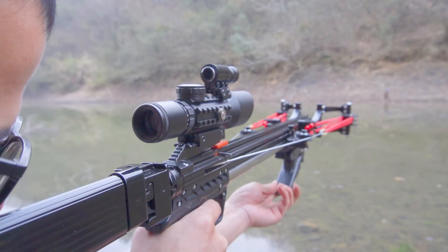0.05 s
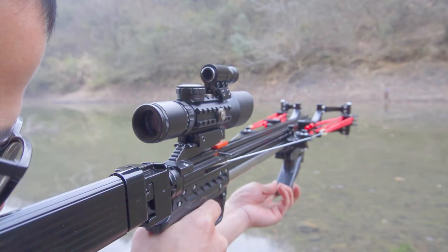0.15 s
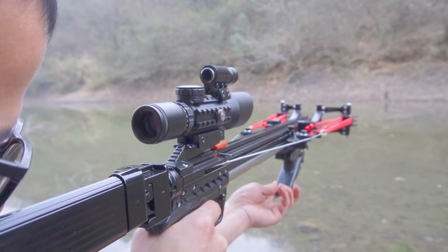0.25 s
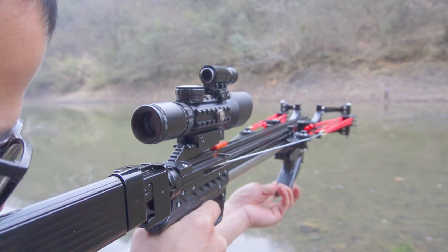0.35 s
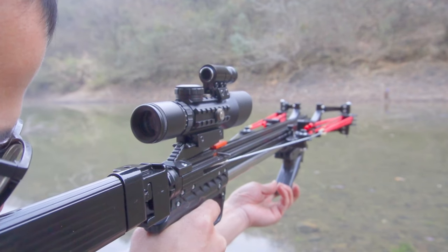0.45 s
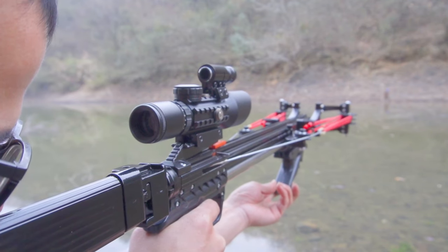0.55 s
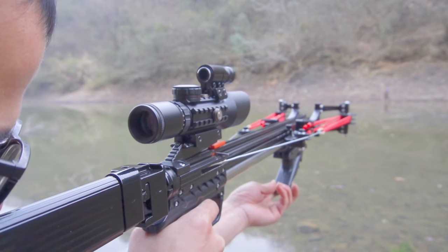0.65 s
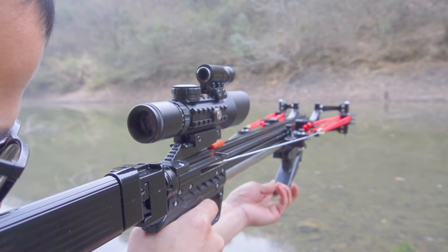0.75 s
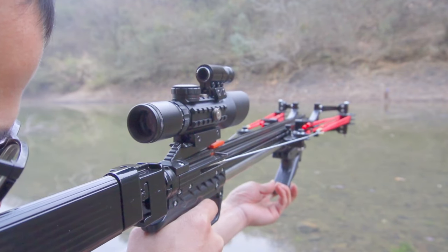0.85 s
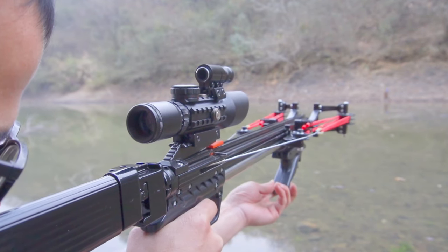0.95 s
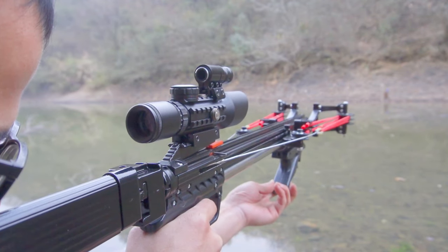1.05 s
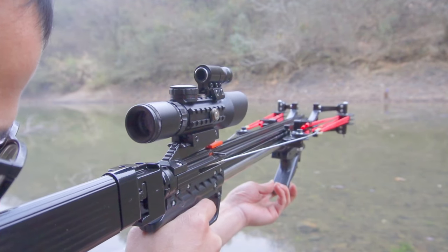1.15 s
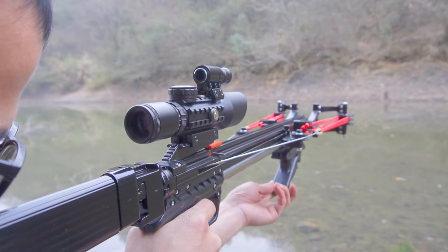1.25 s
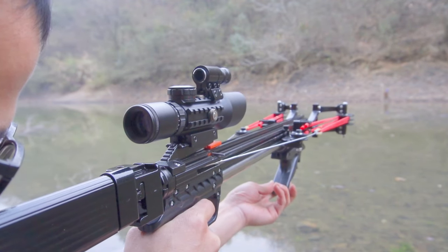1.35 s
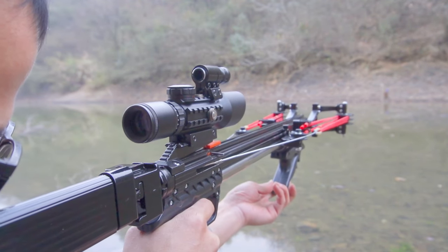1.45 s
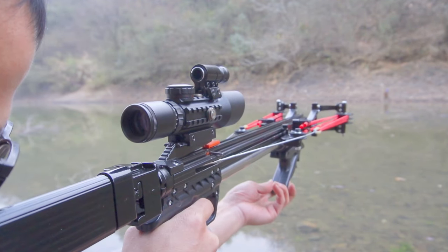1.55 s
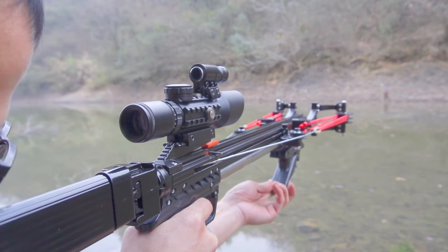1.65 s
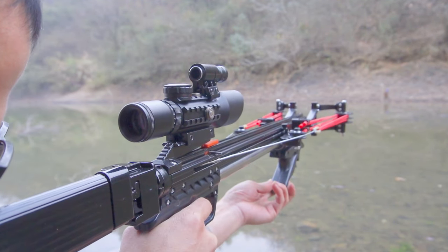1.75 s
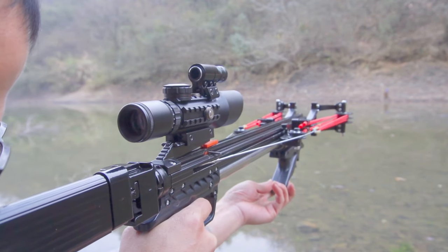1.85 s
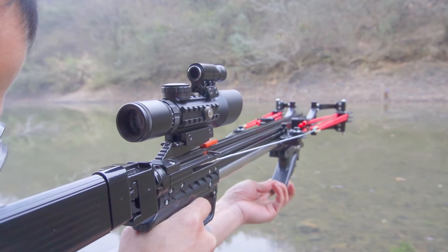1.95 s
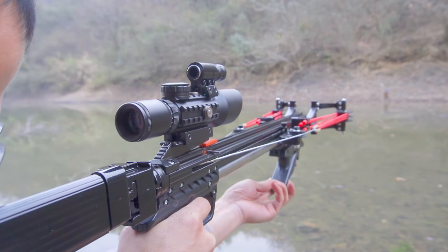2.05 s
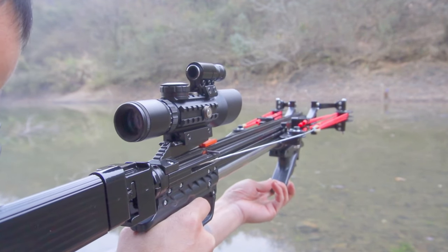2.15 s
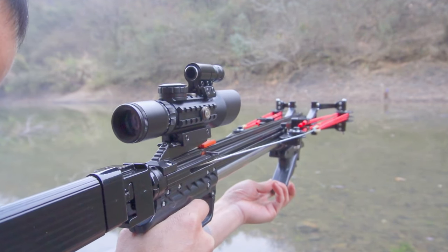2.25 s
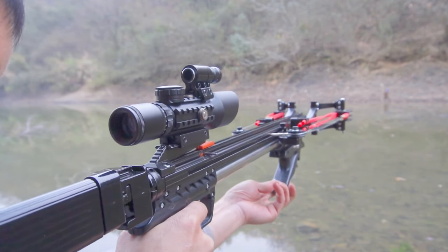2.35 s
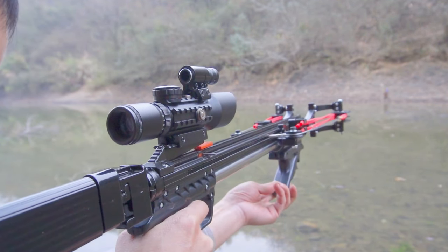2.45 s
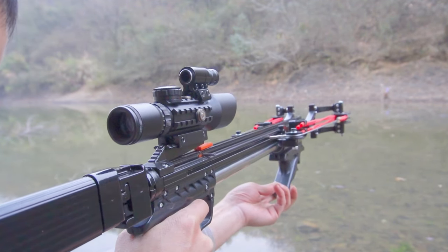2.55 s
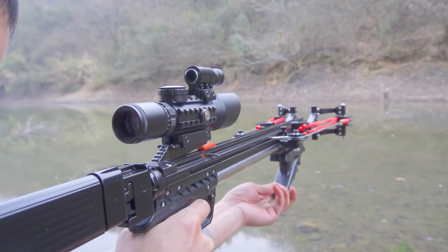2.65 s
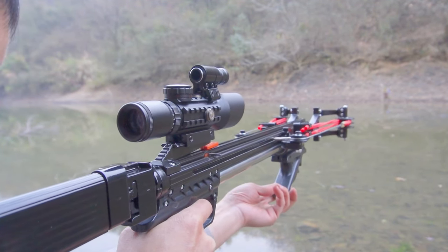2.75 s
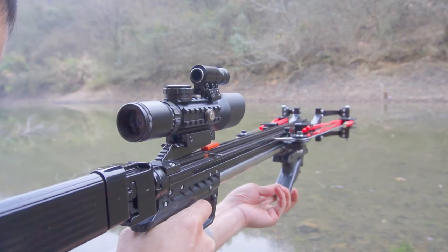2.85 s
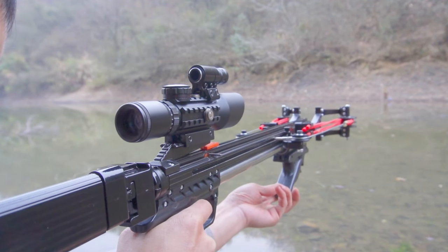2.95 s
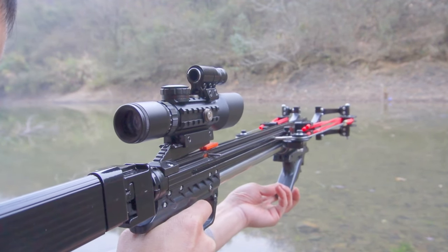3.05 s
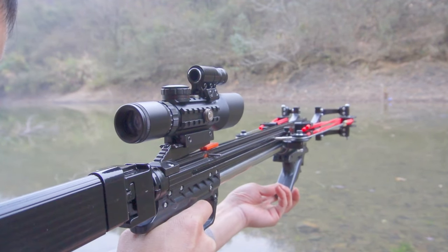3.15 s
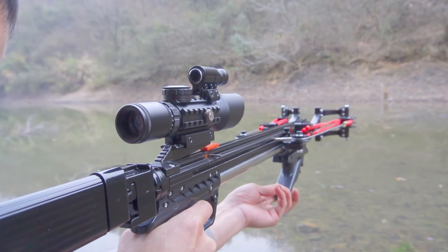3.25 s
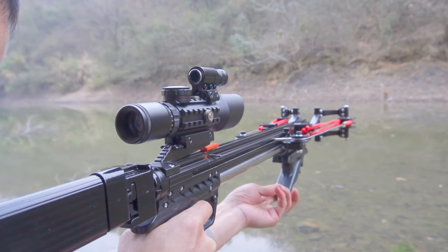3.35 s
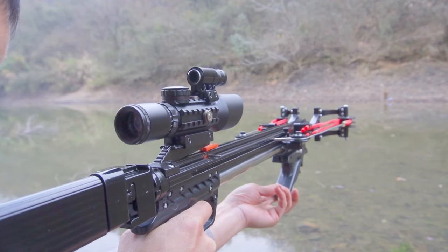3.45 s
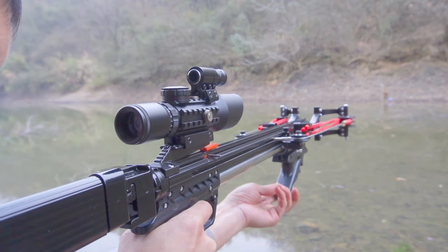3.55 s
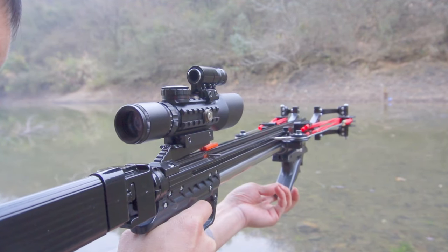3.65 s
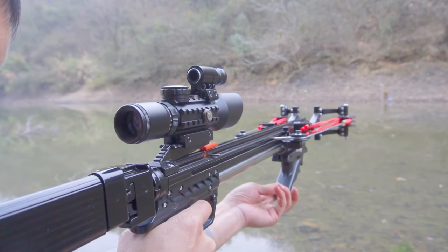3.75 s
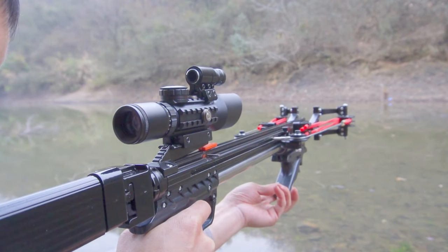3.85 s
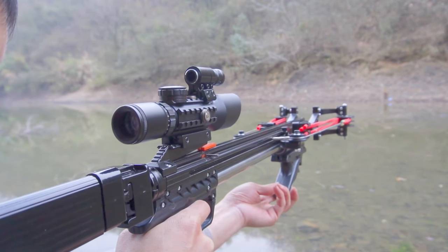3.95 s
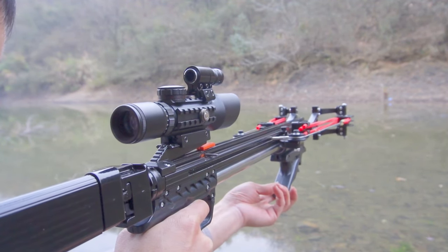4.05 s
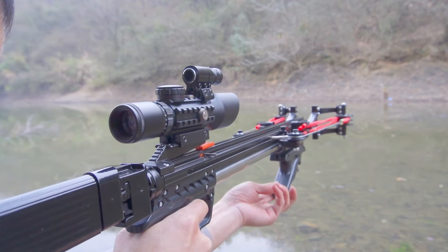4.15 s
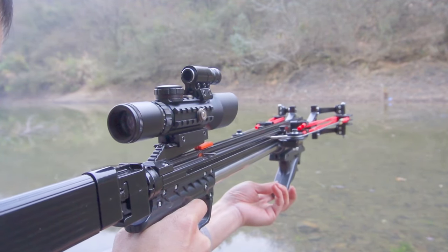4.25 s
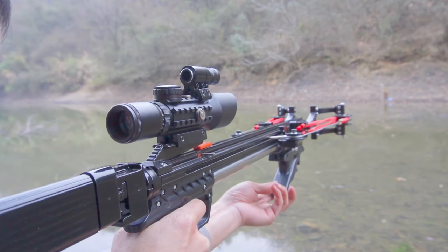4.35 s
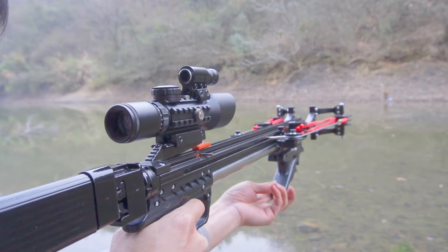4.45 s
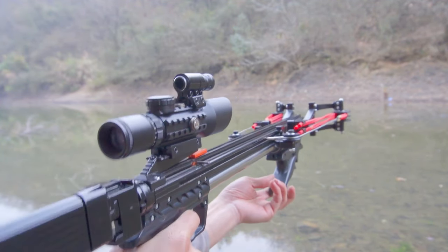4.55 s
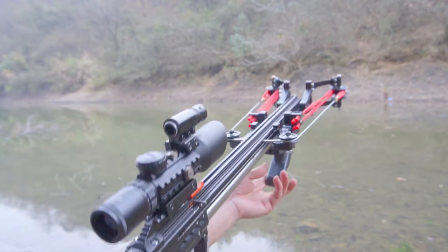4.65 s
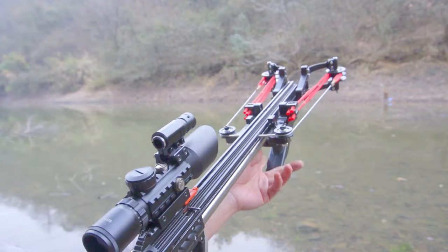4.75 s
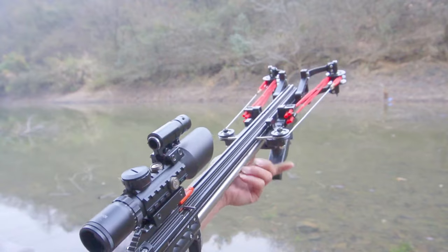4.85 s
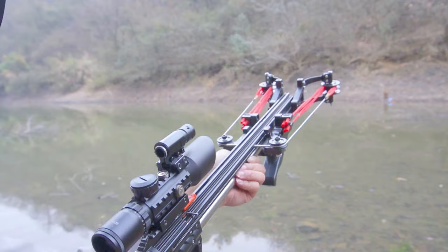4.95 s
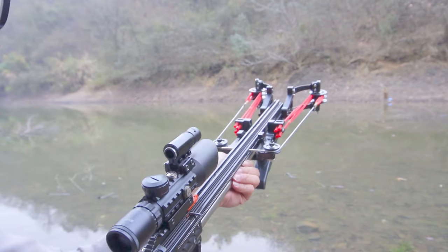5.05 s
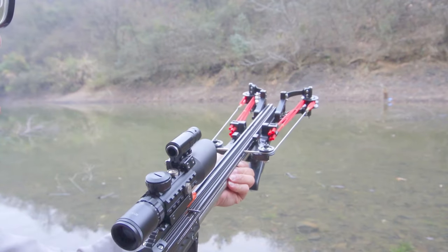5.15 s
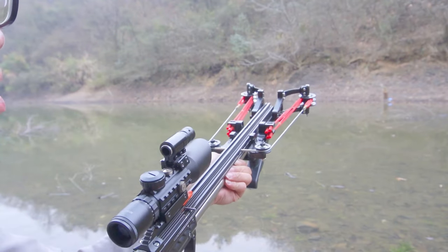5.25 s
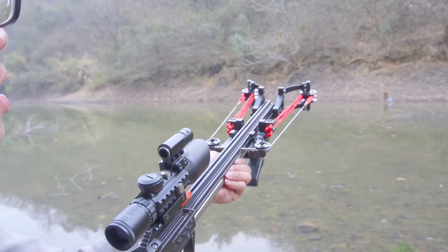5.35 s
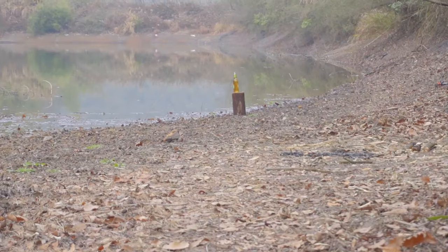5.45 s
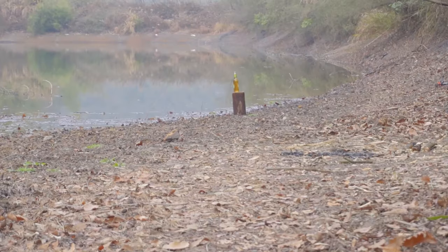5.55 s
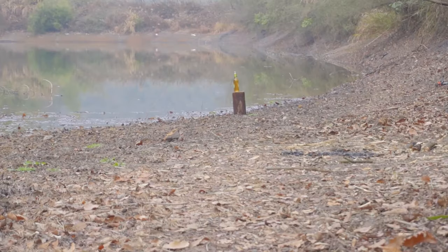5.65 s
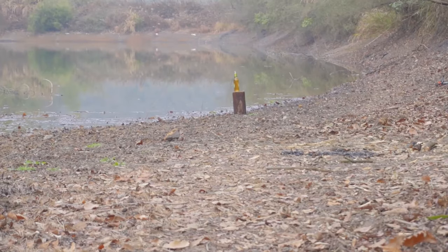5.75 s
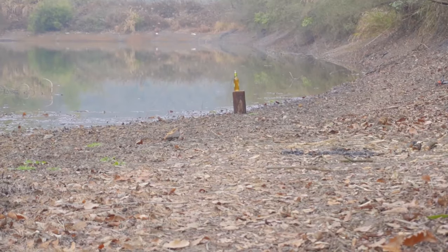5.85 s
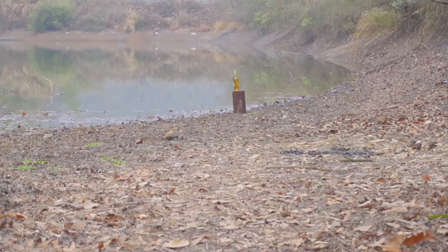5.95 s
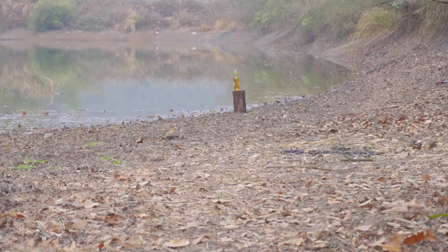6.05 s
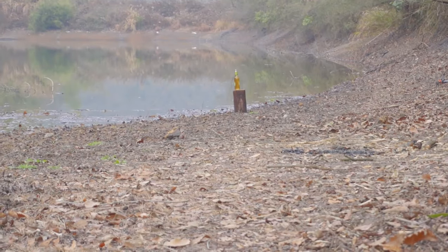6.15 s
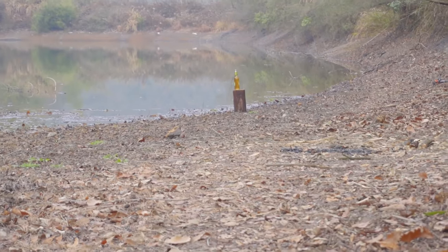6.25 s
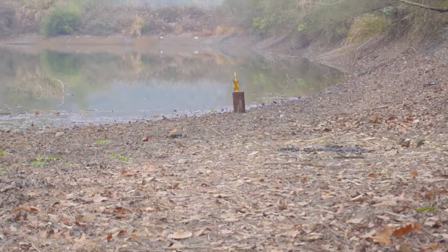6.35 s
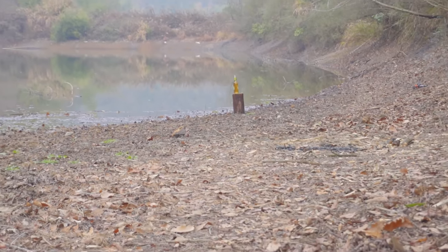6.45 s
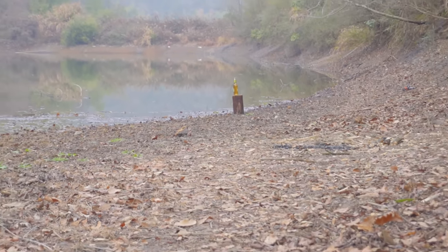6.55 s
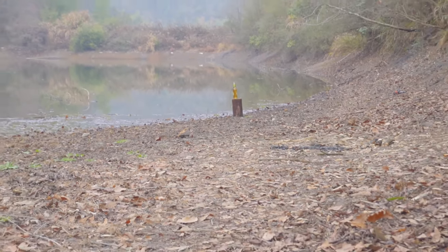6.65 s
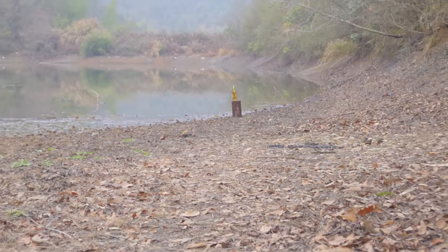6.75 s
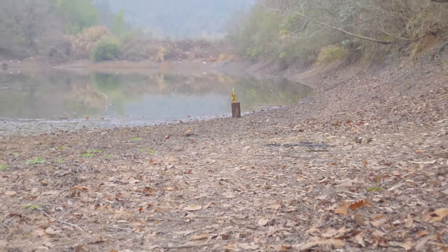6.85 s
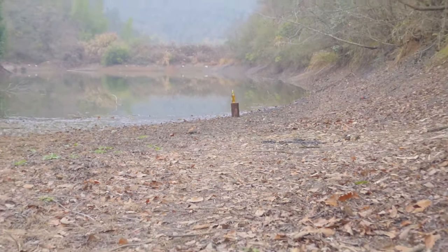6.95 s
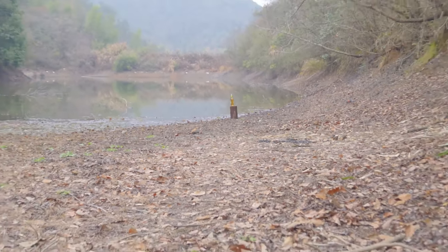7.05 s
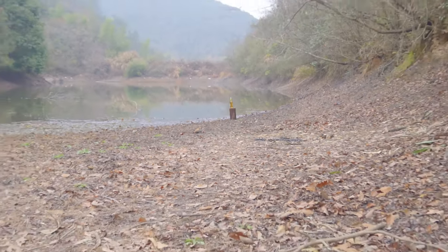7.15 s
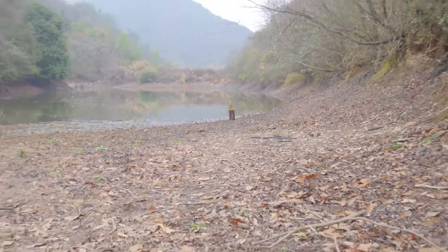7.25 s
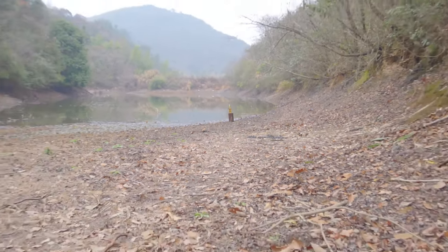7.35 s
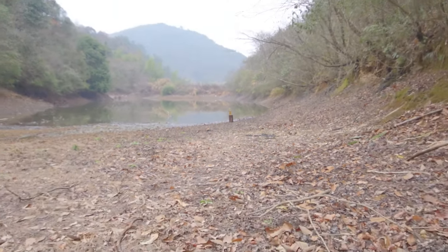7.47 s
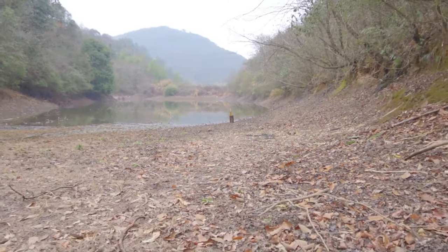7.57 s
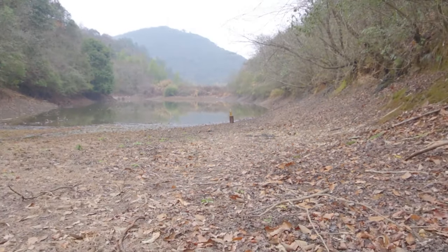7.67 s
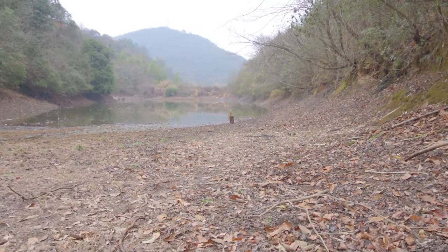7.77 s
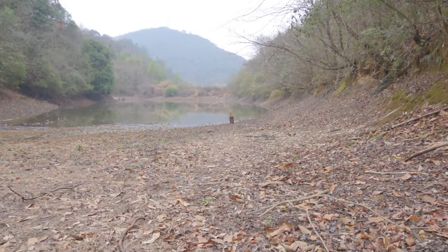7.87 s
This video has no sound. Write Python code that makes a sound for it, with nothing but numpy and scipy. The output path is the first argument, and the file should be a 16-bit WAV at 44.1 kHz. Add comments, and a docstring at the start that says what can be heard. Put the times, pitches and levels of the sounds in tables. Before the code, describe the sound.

Faint, steady valley hush by a pond, with sparse far birds: short rising two-note calls near 0.1, 0.9 and 3.9 seconds, thin whistles between. At 2.25 a close slingshot rifle fires: sear scrape and catch snap, a fast rush of bands, hard carriage slam at 2.32, slack bands flapping and loose parts rattling to 2.46, with a brief metallic ring. At 2.56 the ball cracks sharply into its target; banks scatter the sound for about a second while small bits patter until 3.1. Quiet returns. From 4.55 to 5.0 clustered clicks and sleeve rustle accompany the rifle tilting, with a firm tap at 4.89. From 5.5 fingers softly rub and thump the camera; faint squeak at 6.14, creaks from 6.64 to 6.96, then stronger ones at 7.37-7.54, ending in a sharp click, with low thumps and hollow rubbing until the end.

```python
"""A slingshot rifle fires beside a pond: noise bursts excite the resonances of frame and target as the catch
snaps, the carriage slams and the ball cracks home; decaying sines ring the metal, shaped noise is the bands.
Decaying noise serves as the echo of the banks. Clicks and cloth noise follow as the rifle is tilted, then
fingers rub, slide, thump and squeak on a camera whose mount creaks. Birds, as gliding sines, call far off
over a faint hush of steady noise."""
import sys
import numpy as np
from scipy import signal
from scipy.fft import rfft, irfft, next_fast_len
from scipy.io import wavfile

SR = 44100
rng = np.random.default_rng(int(sys.argv[2]) if len(sys.argv) > 2 else 0)


def int16_out(signal):
    """Quantize to a 16-bit WAV file."""
    q = np.round(np.clip(np.atleast_2d(signal).T, -1, 1) * 32767)
    wavfile.write(sys.argv[1], SR, q.astype(np.int16))


N = 348742

# Every level column in the tables is relative: later gains may shift the whole column.
# A positive pan_db leans to the left.
# Catch, carriage and loose parts of the rifle: start_s, body_db, knock_db, crack_db, t60_s, pan_db
CLACKS = [(2.2558, -12.5, -49, -32.5, 0.015, 2.5), (2.2597, -12.5, -49, -20.5, 0.02, 2.5),
          (2.2671, -8.5, -28.5, -25, 0.025, -2), (2.2724, -12.5, -46, -34, 0.02, 0),
          (2.2958, -13.5, -36, -26, 0.018, 0), (2.3024, -30, -35, -40, 0.016, -5),
          (2.3154, -9.5, -34, -36.5, 0.021, -1), (2.3221, -17, -23.5, -26.5, 0.01, 1),
          (2.3853, -26.5, -31, -45, 0.019, -4), (2.3994, -17, -54, -31, 0.012, 4),
          (2.4164, -26.5, -43, -46, 0.01, 0.5), (2.4555, -26, -39, -51, 0.011, -1)]
# The ball's impact and the bits that fall after it: start_s, body_db, knock_db, crack_db, t60_s, pan_db
IMPACTS = [(2.5565, -8.5, -32, -26.5, 0.011, 0), (2.6853, -22.5, -53.5, -35.5, 0.027, -0.5),
           (2.9049, -29, -48.5, -61, 0.016, -4), (2.9124, -51, -42.5, -62, 0.026, 0.5),
           (2.971, -51, -49, -68, 0.015, -3), (3.033, -53, -56.5, -69, 0.018, -2),
           (3.1034, -41, -64, -69, 0.0084, 6), (3.1153, -48, -63, -79, 0.01, -18)]
# Hands shifting on the rifle: start_s, body_db, knock_db, crack_db, pan_db
HANDLING = [(0.2065, -51, -47.5, -75, 0), (1.7045, -51, -67, -72, -2), (3.1674, -52, -81, -60.5, -10),
            (3.6465, -45, -82, -70, -8), (4.559, -45, -51, -49, 6), (4.5714, -42, -54, -52, 6),
            (4.58, -41, -54, -53, 2), (4.607, -35, -43, -47, 3), (4.6133, -24, -37, -41.5, 4.5),
            (4.6428, -28.5, -45, -49, 4), (4.6627, -30, -71, -47.5, 1), (4.7222, -39, -56, -71, -1),
            (4.776, -42, -45, -59, 0), (4.851, -31, -49.5, -38, -1), (4.857, -38, -54, -44, 12),
            (4.8893, -28.5, -42.5, -41, -0.5), (4.928, -35.5, -52.5, -41, 0),
            (4.9793, -62, -55.5, -67.5, 8), (5.1622, -50, -66, -73, 3)]
# Creaks of the camera mount, and one sharp click near the end: start_s, body_db, knock_db, crack_db
CREAKS = [(5.7732, -41.5, -49, -62), (5.8321, -41.5, -57, -65), (5.8436, -44, -61, -65),
          (6.6402, -28, -44.5, -61), (6.6476, -27, -47, -50), (6.6748, -24.5, -49, -56),
          (6.689, -28.5, -50, -45), (6.7404, -21, -47, -51), (6.767, -19.5, -41, -51),
          (6.7985, -24, -50, -61), (6.8141, -20.5, -43, -64), (6.8392, -25, -50, -64),
          (6.8665, -28.5, -60, -59), (6.889, -24, -40.5, -59), (6.9623, -32, -38.5, -50),
          (7.3748, -21.5, -40, -51), (7.3836, -21.5, -45, -62), (7.3998, -16, -36.5, -45),
          (7.4341, -19, -39.5, -53), (7.4677, -24.5, -33.5, -62), (7.4774, -30, -44, -59),
          (7.4881, -26, -38.5, -65), (7.5428, -19, -37.5, -37.5)]
# Resonances of the rifle frame: centre_hz, width_hz, level_db
FRAME = [(606, 450, -12), (970, 710, -7.5), (1450, 520, -2), (2130, 630, 2), (2880, 340, 5.5),
         (3400, 455, 7.5), (4590, 860, 3.5), (4680, 900, -2), (6760, 2350, -11), (10300, 1300, -11),
         (13400, 2900, -18)]
# Resonances of the target: centre_hz, width_hz, level_db
TARGET = [(416, 380, -16), (790, 380, -11), (1205, 240, -8.5), (1775, 300, -6.5), (3360, 320, -6),
          (4270, 390, -0.5), (5320, 210, -8), (6360, 490, -16), (8150, 530, -4), (10400, 1800, -7.5),
          (14600, 2000, -11)]
# Resonances of the camera mount: centre_hz, width_hz, level_db
MOUNT = [(720, 600, -9), (1422, 200, 1.5), (1924, 355, 1), (2860, 470, -2.5), (3900, 390, -6),
         (5250, 500, -19), (7900, 1500, -19.5), (12500, 4000, -28.5)]
# Lasting ring of the rifle's metal: pitch_hz, level_db, t60_s
METAL = [(506, -21, 0.36), (1486, -10, 0.54), (2440, 1, 0.97), (3036, 2, 0.95), (3795, -3, .7),
         (4230, -5.5, .7), (4150, 1, 0.79), (4382, -10, 0.66), (4650, -3, .6), (6870, 1.5, 1.3),
         (6900, -8, .7), (7031, -5, 2.05), (7200, -6.5, .9), (7560, -1, .6), (10510, -1, .6),
         (11400, -5, 0.47)]
# Noise colour of the scraping sear: frequency_hz, level_db
SEAR = [(1200, -21), (2200, 4), (2700, 11), (3200, -9), (3800, -4), (4800, -24), (9000, -32)]
# Noise colour of the rushing bands and of the faint hiss before the shot: frequency_hz, level_db
BAND_HISS = [(600, -43), (1500, -5), (2500, -8.5), (3400, 2), (5500, -3.5), (7500, -8), (9000, -12),
             (13000, -10.5), (16000, -16)]
# Noise colour of the slapping bands: frequency_hz, level_db
BAND_SLAP = [(60, -61), (170, -27.5), (350, -5.5), (520, 2), (750, -9), (1100, 1.5), (1700, -0.5),
             (2600, -13), (5000, -29)]
# Noise colour of small falling bits: frequency_hz, level_db
PATTER_TONE = [(80, -27), (180, -28), (320, -11), (600, -0.5), (1600, 2.5), (3000, -2.5), (9000, -13.5),
               (16000, -20)]
# Showers of small bits after the impact: start_s, level_db
SHOWERS = [(2.815, -50), (2.912, -47), (2.953, -50.5), (2.985, -53.5), (3.118, -54)]
# Noise colour of the sleeve's cloth: frequency_hz, level_db
CLOTH = [(60, -36), (200, -24), (320, -12.5), (520, -5), (800, -3.5), (1400, -5), (2100, -12), (3400, -5),
         (5500, -15.5), (9000, -16.5), (16000, -21)]
# Strokes of a sleeve on the stock: start_s, hold_s, level_db
SLEEVE_STROKES = [(4.555, 0.2, -54), (4.783, 0.018, -51), (4.899, 0.004, -49.5), (5.029, 0.16, -68)]
# Decay of the scatter from the banks, before each echo's stretch factor: frequency_hz, t60_s
BANKS = [(200, 0.9), (1000, 0.88), (2500, 1.01), (5000, 0.89), (9000, 0.71), (16000, 0.18)]
# Colour of the near scatter: frequency_hz, level_db
SPRAY = [(80, -42), (200, -27.5), (380, -9.5), (700, -4.5), (1050, -4), (2000, -6), (3200, -7), (4600, 6),
         (6000, -3), (9000, -5), (15500, -1)]
# Colour of the shore's echo: frequency_hz, level_db
SHORE = [(80, -42), (200, -29), (600, -3), (1000, -6), (1600, 3.5), (2500, 8.5), (3300, -1.5), (4400, -5),
         (6500, -4.5), (9000, -6.5), (15000, 1.5)]
# Colour of the late echo: frequency_hz, level_db
FAR_BANK = [(300, -23), (1500, -2.5), (4500, 3.5), (8000, -5.5), (14000, -11.5)]
# The hand moving over the camera: time_s, rubbing_db, sliding_hiss_db
HAND = [(5.45, -83, -88), (5.57, -61, -75), (5.73, -63.5, -74), (5.91, -59.5, -62), (6.19, -59.5, -54.5),
        (6.61, -55, -55.5), (6.84, -49, -50.5), (7.41, -46.5, -53.5), (7.52, -54, -55.5),
        (7.77, -48.5, -64), (7.91, -56, -64.5)]
# Quick scuffs of the fingers: start_s, hold_s, rubbing_db, sliding_hiss_db
SCUFFS = [(5.598, 0.024, -53.5, -74), (5.836, 0.013, -62, -60.5), (6.004, 0.11, -58.5, -61.5),
          (6.618, 0.02, -51.5, -61), (7.39, 0.084, -43, -51), (7.516, 0.05, -62, -52.5),
          (7.666, 0.14, -52, -63)]
# Noise colour of the rubbing palm: frequency_hz, level_db
RUBBING = [(120, -22), (220, -7), (340, 3.5), (500, 2), (800, 2), (1100, -3.5), (1650, 1.5), (2200, -10),
           (3200, -16.5), (5000, -18)]
# Noise colour of the camera's hollow shell: frequency_hz, level_db
HOLLOW = [(300, -28), (560, -10), (680, 2.5), (800, -2), (1050, -2), (1250, -1.5), (1500, 2.5), (2100, -10),
          (3200, -19), (6000, -24.5)]
# Noise colour of a light slide: frequency_hz, level_db
LIGHT_SLIDE = [(1800, -7.5), (2600, -4), (3300, -5), (4100, 0.5), (4650, 5.5), (5300, -2.5), (5750, -7),
               (6600, -4), (7700, 1.5), (8600, -2), (9350, -2), (10400, -11), (15500, -18.5)]
# Noise colour of a firm slide: frequency_hz, level_db
FIRM_SLIDE = [(1800, -12), (2600, -2), (3700, -4.5), (5000, 1), (6100, -1.5), (7500, -1), (9700, -4.5),
              (11500, -9.5), (14500, -11), (16000, -14.5)]
# Noise colour of the camera's low shaking: frequency_hz, level_db
BUMPS = [(10, -40), (25, -32), (45, -3), (75, -1.5), (130, 1), (200, -7), (300, -5.5), (420, -13),
         (700, -49), (2000, -80)]
# Fingers thumping the camera: start_s, level_db, pitch_hz
THUMPS = [(5.49, -64, 100), (5.615, -59, 129), (5.781, -46, 137), (5.89, -52, 120), (5.926, -46, 99),
          (6, -44, 172), (6.215, -58, 110), (6.331, -46.5, 310.5), (6.62, -53, 110), (6.69, -59, 110),
          (6.92, -50, 110), (7.23, -52, 130), (7.45, -30.5, 218), (7.477, -31.5, 258), (7.533, -34, 198),
          (7.588, -39, 96.9), (7.626, -36, 201), (7.675, -36.5, 91.5), (7.722, -34.5, 165),
          (7.84, -45.5, 140)]
# Thin squeaks, and a faint bright band of sliding hiss: start_s, hold_s, pitch_hz, level_db
SQUEAKS = [(6.142, 0.12, 4540, -62), (6.148, 0.25, 9400, -60.5), (6.926, 0.4, 9600, -65),
           (7.785, 0.0079, 13500, -52)]
# One bird's two-note rising call: start_s, level_db
RISING_CALLS = [(0.11, -60.5), (0.86, -64), (3.93, -63)]
# Whistles of other birds: start_s, length_s, start_hz, end_hz, level_db, hoarseness as a share of pitch
WHISTLES = [(0, 0.06, 3150, 2984, -62.5, 0.043), (.72, 0.13, 3344, 3230, -63, 0.017),
            (1.08, 0.053, 1870, 1800, -69, .014), (1.24, 0.2, 3196, 3396, -63.5, .025),
            (1.81, 0.11, 3820, 3740, -71, .008), (1.95, 0.06, 2700, 3030, -68, 0.016),
            (2.082, 0.04, 3000, 2970, -60.5, .014), (3.991, .12, 2780, 3040, -62.5, .07),
            (4.088, 0.1, 2805, 2190, -63.5, .08), (4.412, 0.042, 2780, 2890, -66, .04)]
# Noise colour of the valley's hush: frequency_hz, level_db
AIR_COLOUR = [(25, -15), (100, -23), (170, -16.5), (300, -13), (600, -3), (1050, -2), (1500, -3),
              (2200, -3.5), (3200, -3), (4300, -6.5), (8000, -9), (15000, -12), (16000, -18)]

RELEASE_S, TRAVEL_S = 2.2548, 0.074  # the catch lets go; the carriage runs to its stop
SLACK_S, FLAP_S = 2.385, 0.07  # the slack bands swing back and flap this long
HANDLING_T60_S = 0.012
PALM_ON_S, PALM_SHIFT_S = 6.1, 0.44  # midpoint and duration of the palm settling on the shell
LEAVE_S = 7.59  # the palm leaves the shell, which sounds hollow from then on
DIP_LENGTH_S, DIP_DB = 0.055, -7.08  # the rubbing and sliding dip briefly at that moment
LIGHT_DB, FIRM_DB = -63.5, -46.5  # rubbing_db of the lightest touch and of a full grip
CREAK_T60_S, CREAK_PAN_DB = 0.0092, 3  # a little to the left
SQUEAK_WIDTH_HZ = 590  # from the centre to the point 22 dB down
RISE_FROM_HZ, RISE_TO_HZ = 1800, 2576
NOTE_S, NOTE_STEP_S, SECOND_NOTE_DB = 0.068, 0.064, -1.5
TOP_HZ = 15950  # middle of the upper band limit


def shot():
    """Stored elastic energy is released: the bands drive the carriage, whose blows excite the frame."""
    clacks = contacts(CLACKS, FRAME, width=0.27, attack=0.00074, knock_db=-21.0, body_db=-27.0,
                      crack_db=-15.0, after_db=-19, after_t60=0.098)
    rifle = trigger() + bands() + clacks
    add(rifle, 2.27, metal_ring(db=-41, blur=2.24))
    return rifle


def trigger():
    """Friction noise: the sear scrapes free, and a faint hiss swells just before the shot."""
    scrape = envelope(2.236, 0.0088, db=-51, rise_t60=0.058, fall_t60=0.06)
    swell = envelope(2.225, 0.028, db=-62.0, rise_t60=0.08, fall_t60=0.03, swell_db=11.5)
    sear = rustle(scrape, SEAR, width=0.29, grain_db=2, grain_rate=410)
    early_hiss = rustle(swell, BAND_HISS, width=0.67, grain_db=6, grain_rate=450)
    return sear + early_hiss


def bands():
    """Flow noise grows as the bands gather speed; they slap once taut, once deeper at the stop, then flap."""
    run = envelope(RELEASE_S, TRAVEL_S, db=-29.0, rise_t60=0.012, fall_t60=0.045, swell_db=4.5)
    flutter = envelope(SLACK_S, FLAP_S, db=-38, rise_t60=0.42, fall_t60=0.4, swell_db=-4)
    taut = envelope(2.294, 0.01, db=-27.5, rise_t60=0.06, fall_t60=0.07)
    stop = envelope(2.317, 0.009, db=-30.5, rise_t60=0.04, fall_t60=0.075)
    flap = envelope(SLACK_S, FLAP_S, db=-46, rise_t60=0.5, fall_t60=0.4, swell_db=1.5)
    # keeps the slow rises of flutter and flap from sounding before the release
    freed = envelope(RELEASE_S, 1, db=0, rise_t60=0.012, fall_t60=1)
    hiss = rustle(freed * np.hypot(run, flutter), BAND_HISS, width=0.69, grain_db=1.5, grain_rate=700)
    slack_slap = rustle(freed * np.hypot(stop, flap), BAND_SLAP, width=0.079, grain_db=4.5, grain_rate=300)
    taut_slap = rustle(taut, BAND_SLAP, width=0.12, grain_db=3.5, grain_rate=300)
    taut_slap = coloured(taut_slap, [(250, -15), (800, 1.5)])  # taut rubber gives little bass
    return hiss + taut_slap + slack_slap


def metal_ring(db, blur):
    """Modal decay: loosely joined metal parts ring on, their phases drifting as they rattle."""
    t = np.arange(SR) / SR
    modes = 0
    for hz, level, t60 in METAL:
        drift = blur * np.cumsum(rng.standard_normal((2, SR)), axis=1) / np.sqrt(SR)  # in cycles
        phase = hz * t + rng.random() + drift
        modes = modes + amp(level - 60 * t / t60) * np.sin(2 * np.pi * phase)
    return amp(db) * modes * (1 - np.exp(-t / 0.014))


def impact():
    """Impulsive excitation: the ball cracks against its mark, ground and shore scatter it, bits settle."""
    crack = contacts(IMPACTS, TARGET, width=0.4, attack=0.00095, knock_db=-13.0, body_db=-24.5,
                     crack_db=-18.0, after_db=-37, after_t60=0.085)
    near = amp(-41) * unit(coloured(scatter(stretch=0.21, rise=0.0075, width=0.68), SPRAY))
    shore = amp(-45.5) * unit(coloured(scatter(stretch=0.69, rise=0.026, width=0.52), SHORE))
    add(crack, 2.558, (near + shore) * amp([[-1.7], [1.7]]))
    return crack + settling()


def settling():
    """Many small impacts merge into granular noise: each shower comes quickly and thins out."""
    showers = [envelope(s, 0, db, rise_t60=0.07, fall_t60=0.42) for s, db in SHOWERS]
    level = np.linalg.norm(showers, axis=0)
    patter = rustle(level, PATTER_TONE, width=0.56, grain_db=3.5, grain_rate=180)
    return amp([[-1.2], [1.2]]) * patter


def handling():
    """Contact and friction: parts click as the rifle is tilted, and a sleeve rubs."""
    taps = [(s, db, knock, crack, HANDLING_T60_S, pan) for s, db, knock, crack, pan in HANDLING]
    clicks = contacts(taps, FRAME, width=0.47, attack=0.00035, knock_db=-11.5, body_db=-23.0,
                      crack_db=-14.5, after_db=-15.5, after_t60=0.077)
    strokes = [envelope(s, hold, db, rise_t60=0.36, fall_t60=0.13) for s, hold, db in SLEEVE_STROKES]
    sleeve = np.linalg.norm(strokes, axis=0)
    return clicks + rustle(sleeve, CLOTH, width=0.46, grain_db=2.5, grain_rate=110)


def stock_ring():
    """Modal decay: a firm tap rings the stock in three damped modes."""
    track, t = np.zeros((2, N)), np.arange(SR // 4) / SR
    modes = [(577, -42.5, 0.22), (2180, -26.5, 0.024), (3590, -18.5, 0.026)]  # pitch_hz, level_db, t60_s
    ring = sum(amp(db - 60 * t / t60) * np.sin(2 * np.pi * hz * t) for hz, db, t60 in modes)
    add(track, 4.887, ring * (1 - np.exp(-t / 0.0011)) ** 2)
    return track


def far_bank():
    """Diffuse reflection: a faint swell of smeared noise stands for the opposite bank's late echo."""
    level = envelope(3.2, 0.24, db=-63, rise_t60=0.6, fall_t60=1.2, swell_db=5)
    return amp([[-1.4], [1.4]]) * rustle(level, FAR_BANK, width=0.73, grain_db=2.0, grain_rate=75)


def carrying():
    """Sliding friction: grip pressure recolours the hiss; the shell sounds hollow unless the palm covers it."""
    t = np.arange(N) / SR
    s, *levels = np.transpose(HAND)
    rub_db, slide_db = [np.interp(t, s, level, left=-200) for level in levels]
    pressure = np.clip((rub_db - LIGHT_DB) / (FIRM_DB - LIGHT_DB), 0.03, 0.95)
    covered = np.clip(.5 + (t - PALM_ON_S) / PALM_SHIFT_S, 0, 1) * (t < LEAVE_S)
    dip = amp(DIP_DB * envelope(LEAVE_S, DIP_LENGTH_S, db=0, rise_t60=0.14, fall_t60=0.07))
    scuffs = [amp([[rub], [hiss]]) * envelope(s, hold, db=0.5, rise_t60=0.11, fall_t60=0.23)
              for s, hold, rub, hiss in SCUFFS]
    rub, slide = dip * np.linalg.norm([amp([rub_db, slide_db])] + scuffs, axis=0)
    palm = rustle(rub, RUBBING, width=0.56, grain_db=2.0, grain_rate=150)
    shell = rustle(rub, HOLLOW, width=0.65, grain_db=1.5, grain_rate=85)
    light = rustle(slide, LIGHT_SLIDE, width=0.95, grain_db=2.0, grain_rate=270)
    firm = rustle(slide, FIRM_SLIDE, width=1.0, grain_db=1.5, grain_rate=1200)
    shaking = amp(rub_db - 13.6 * pressure)  # a loose hold lets the camera wobble
    rumble = rustle(shaking, BUMPS, width=0.8, grain_db=8, grain_rate=25)
    rubbing = amp(1.26) * blend(covered, amp(-0.5) * shell, palm)
    sliding = amp(2.5) * blend(pressure ** 1.8, light, firm)
    return rubbing + sliding + amp(-8.0) * rumble


def creaking():
    """Stick-slip friction: the camera mount creaks under the grip; one sharp click comes near the end."""
    creaks = [(s, db, knock, crack, CREAK_T60_S, CREAK_PAN_DB) for s, db, knock, crack in CREAKS]
    sound = contacts(creaks, MOUNT, width=0.35, attack=0.0001, knock_db=-12.0, body_db=-21.5,
                     crack_db=-16, after_db=-8.5, after_t60=0.052)
    lag_s = .00015  # the sound reaches the left microphone first
    return filtered(sound, lambda hz: np.exp(1j * np.pi * hz * lag_s * np.array([[1], [-1]])))


def squeak():
    """Narrow-band noise: thin squeaks and a faint bright band of sliding hiss."""
    track = np.zeros((2, N))
    for s, hold, hz, db in SQUEAKS:
        band = [(hz / 2, -70), (hz - SQUEAK_WIDTH_HZ, -22), (hz, 0), (hz + SQUEAK_WIDTH_HZ, -22), (hz * 2, -70)]
        level = envelope(s, hold, db, rise_t60=0.05, fall_t60=0.07)
        track += rustle(level, band, width=0.48, grain_db=4.5, grain_rate=71)
    return track


def thumps(db, t60, rumble_db):
    """Damped oscillation: a soft fingertip gives a quickly dying low push and shakes the camera briefly."""
    track, t = np.zeros((2, N)), np.arange(SR // 8) / SR
    for s, level_db, hz in THUMPS:
        decay = amp(level_db + db - 60 * t / t60)
        add(track, s, decay * (1 - np.exp(-t / 0.002)) ** 2 * np.sin(2 * np.pi * hz * t))
    shakes = [envelope(s, 0.0071, level_db + rumble_db, rise_t60=0.08, fall_t60=0.24)
              for s, level_db, hz in THUMPS]
    shake = np.linalg.norm(shakes, axis=0)
    return track + rustle(shake, BUMPS, width=0.99, grain_db=4.0, grain_rate=45)


def birds():
    """Frequency modulation: far, fluttering whistles slide quickly, then level off, blurred by the woods."""
    song = np.zeros((2, N))
    rising = [(s + k * NOTE_STEP_S, NOTE_S, RISE_FROM_HZ, RISE_TO_HZ, db + k * SECOND_NOTE_DB, 0.016)
              for s, db in RISING_CALLS for k in (0, 1)]
    for s, length, start_hz, end_hz, db, hoarse in rising + WHISTLES:
        u = np.linspace(0, 1, max(int(length * SR), 2))
        glide = start_hz + (end_hz - start_hz) * np.sin(np.pi / 2 * u)
        hz = glide * (1 + hoarse * wobble(350, len(u)))
        flutter = unit(amp(4 * wobble(110, len(u))))
        swell = np.sqrt(np.abs(np.sin(np.pi * u)))
        add(song, s, amp(db) * flutter * swell * np.sin(2 * np.pi * np.cumsum(hz) / SR))
    return amp(-1.0) * song + amp(-1.0) * echo(song, stretch=0.9, rise=0.0073, width=0.96)


def air():
    """Stationary broadband noise: the still, faint hush of the valley."""
    return amp(-63.0) * unit(coloured(pair(N, width=0.98), AIR_COLOUR))


def contacts(rows, body, width, attack, knock_db, body_db, crack_db, after_db, after_t60):
    """Source and resonator: each contact is a short burst into a body, with a weaker chatter after it."""
    track, t = np.zeros((2, N)), np.arange(SR // 8) / SR

    def resonances(f):
        """Parallel second-order resonances, summed with alternating sign."""
        return sum((-1) ** k * amp(db) * 1j * f * w / (c * c - f * f + 1j * f * w)
                   for k, (c, w, db) in enumerate(body))

    edges_hz = [(260, 1200), (1200, 6000), (6000, 16000)]  # knock, body, crack
    ranges = [signal.butter(4, edges, "band", fs=SR, output="sos") for edges in edges_hz]
    for s, db, knock, crack, t60, pan in rows:
        burst = amp(-60 * t / max(t60, .002))
        chatter = amp(after_db - 60 * t / after_t60)
        force = (burst + chatter) * (1 - np.exp(-t / attack))
        ring = filtered(pair(len(t), width) * force, resonances)
        # soft contacts are mostly knock, hard ones mostly crack
        levels = [knock + knock_db, db + body_db, crack + crack_db]
        blow = sum(amp(level) * unit(signal.sosfilt(band, ring)) for level, band in zip(levels, ranges))
        add(track, s, blow * amp([[pan / 2], [-pan / 2]]))
    return track


def rustle(level, spectrum, width, grain_db, grain_rate):
    """Granular noise: uneven short grains, shaped in spectrum, follow a gain curve."""
    heard = np.flatnonzero(level > 1e-6)
    track = np.zeros((2, N))
    if len(heard):
        a, b = heard[0], heard[-1] + 1
        grains = pair(b - a, width) * amp(grain_db * wobble(grain_rate, b - a))
        track[:, a:b] = level[a:b] * unit(coloured(grains, spectrum))
    return track


def scatter(stretch, rise, width):
    """Diffuse decay: one second of scatter from ground and wooded banks swells, then dies by frequency."""
    hz, t, z = signal.stft(pair(SR, width), SR, nperseg=256)
    decay = amp(-60 * t / (stretch * along(BANKS, hz)[:, None]))
    tail = signal.istft(z * decay, SR, nperseg=256)[1]
    tail = tail * (1 - np.exp(-np.arange(tail.shape[1]) / SR / rise))
    return tail / np.linalg.norm(tail[0])


def echo(x, stretch, rise, width):
    """Linear superposition: the surroundings answer a sound by convolution with their scatter."""
    return signal.fftconvolve(x, scatter(stretch, rise, width), axes=1)[:, :N]


def envelope(s, hold, db, rise_t60, fall_t60, swell_db=0):
    """Exponential growth and decay: a gain rises to db at s, holds while changing by swell_db, then dies."""
    t = np.arange(N) / SR - s
    outside = np.maximum(-t, 0) / rise_t60 + np.maximum(t - hold, 0) / fall_t60
    swell = swell_db * np.clip(t / max(hold, 1e-4), 0, 1)
    return amp(db + swell - 60 * np.minimum(outside, 4))


def blend(share, a, b):
    """Equal-power mix of two noises: share 0 is a, 1 is b."""
    share = np.clip(share, 0, 1)
    return np.sqrt(1 - share) * a + np.sqrt(share) * b


def pair(n, width):
    """Partial coherence: white noise at two microphones, width 0 is mono, 1 unrelated."""
    mid, side = rng.standard_normal((2, n))
    return np.array([mid + width * side, mid - width * side])


def wobble(rate, n):
    """Smooth random fluctuation: a curve of n samples with rate knots a second."""
    place = np.arange(n) * (rate / SR)
    knot = place.astype(int)
    heights = rng.standard_normal(knot[-1] + 2)
    u = place - knot
    return heights[knot] + np.diff(heights)[knot] * u * u * (3 - 2 * u)


def filtered(x, response):
    """Linear filtering: x times a complex response of frequency."""
    n = x.shape[-1]
    m = next_fast_len(n + 8192)  # room for the filter's tail
    return irfft(rfft(x, m) * response(np.fft.rfftfreq(m, 1 / SR)), m)[..., :n]


def coloured(x, spectrum):
    """Spectral shaping: x weighted by (frequency_hz, level_db) points."""
    return filtered(x, lambda hz: amp(along(spectrum, hz)))


def along(points, hz):
    """Logarithmic pitch scale: (frequency_hz, value) points read on a log axis."""
    f, v = np.transpose(points)
    return np.interp(np.log(hz + 1), np.log(f + 1), v)


def amp(db):
    """The decibel law: level to pressure gain."""
    return 10 ** (np.asarray(db) / 20)


def unit(x):
    """Normalization of effective pressure: scale to rms 1."""
    return x / np.sqrt(np.mean(x ** 2) + 1e-20)


def add(track, s, sound):
    """Superposition: mix a sound into the track at time s."""
    part = track[:, max(round(s * SR), 0):][:, :sound.shape[-1]]
    part += sound[..., :part.shape[-1]]


def scene():
    """Superposition of everything heard at the water's edge."""
    rifle = shot() + impact() + handling()
    answer = amp(-17.5) * echo(rifle, stretch=1.0, rise=0.012, width=0.32) + far_bank()
    camera = carrying() + creaking() + squeak() + thumps(db=5.5, t60=0.034, rumble_db=-10.5)
    return rifle + stock_ring() + answer * amp([[-1.2], [1.2]]) + camera + birds() + air()


def record(dry):
    """Spatial coherence: close microphones hear bass alike, treble apart; deep bass and top are cut."""
    mid, side = (dry[0] + dry[1]) / 2, (dry[0] - dry[1]) / 2
    side = coloured(side, [(150, -8.0), (450, -3), (1200, 0.5), (4000, 0.5), (10000, 0.5)])
    low_cut_hz = 55
    low_cut = signal.butter(2, low_cut_hz, "high", fs=SR, output="sos")
    heard = signal.sosfilt(low_cut, [mid + side, mid - side])
    return filtered(heard, lambda hz: np.clip(.5 + (TOP_HZ - hz) / 300, 0, 1))  # 300 Hz wide slope


dry = scene()
out = record(dry)
int16_out(out)
```